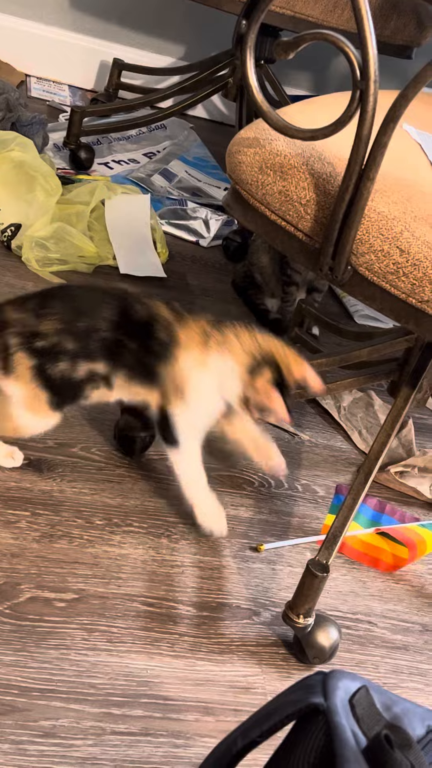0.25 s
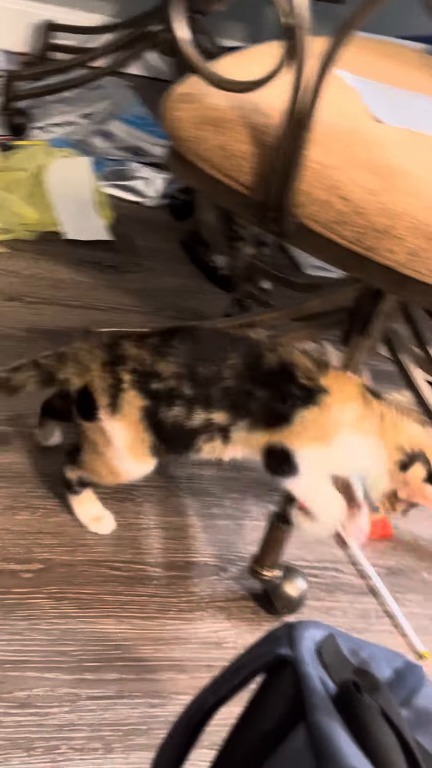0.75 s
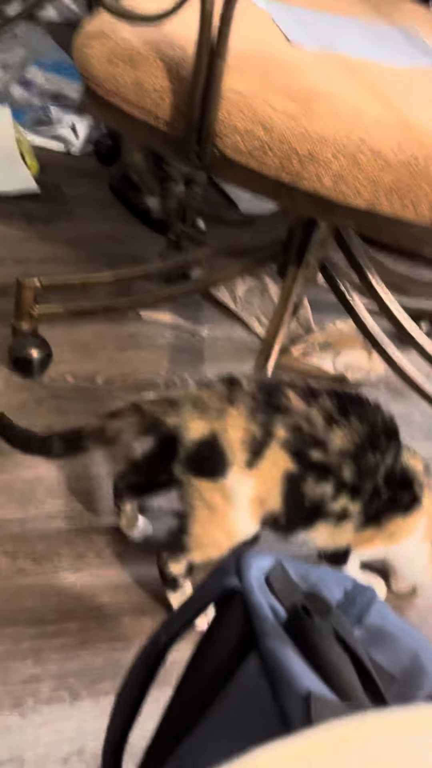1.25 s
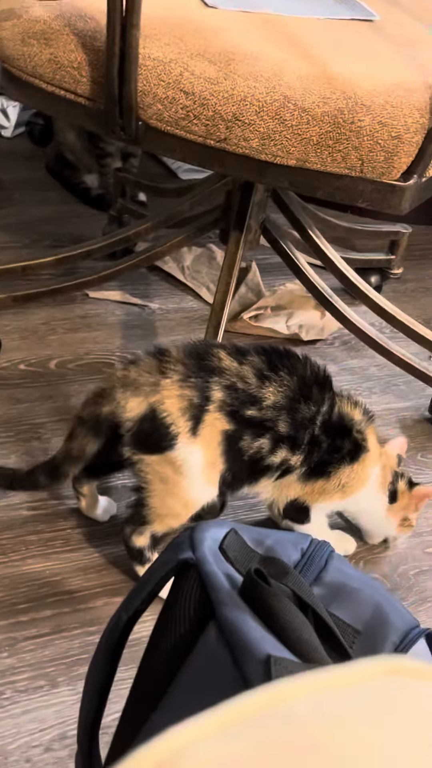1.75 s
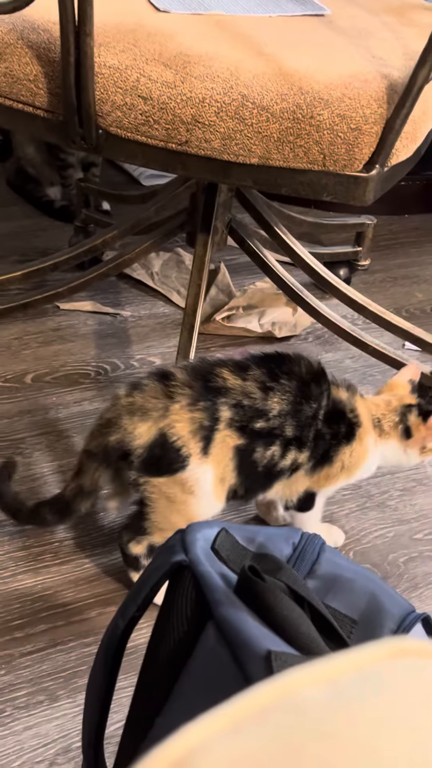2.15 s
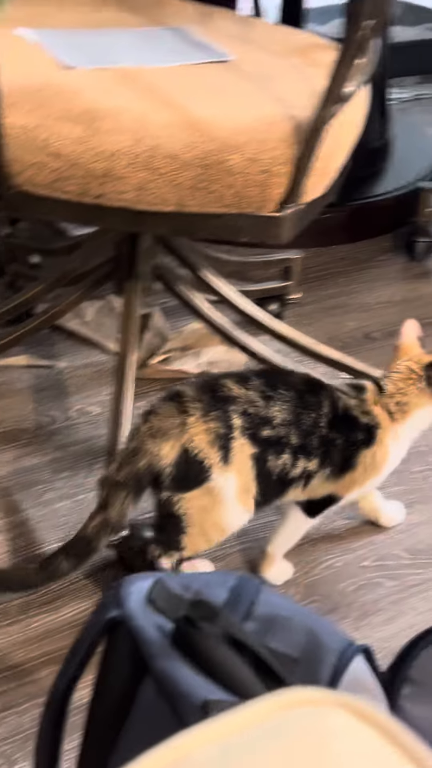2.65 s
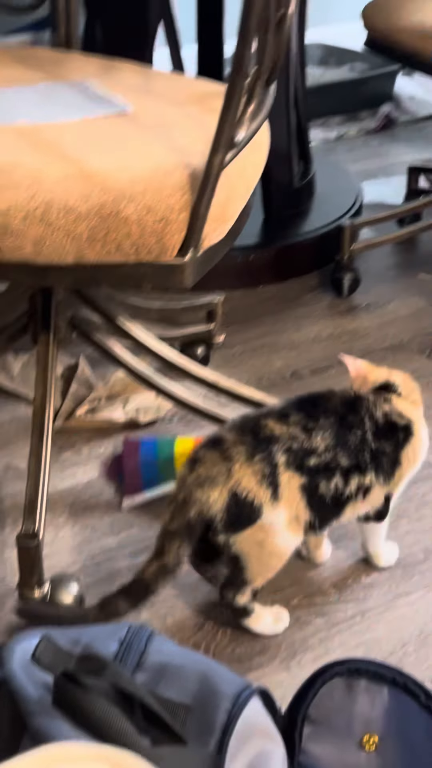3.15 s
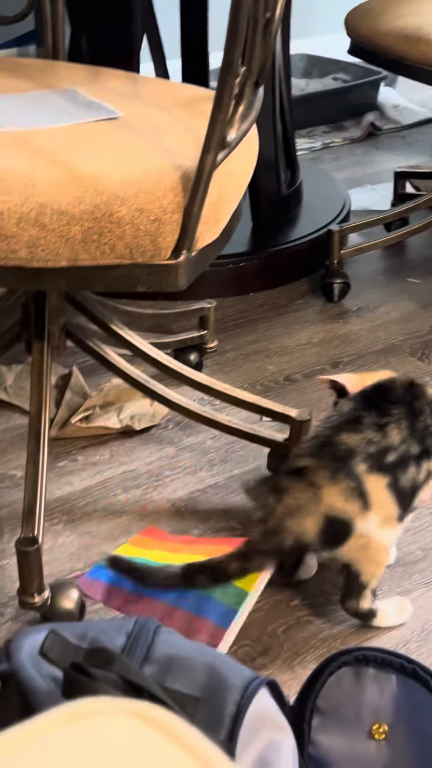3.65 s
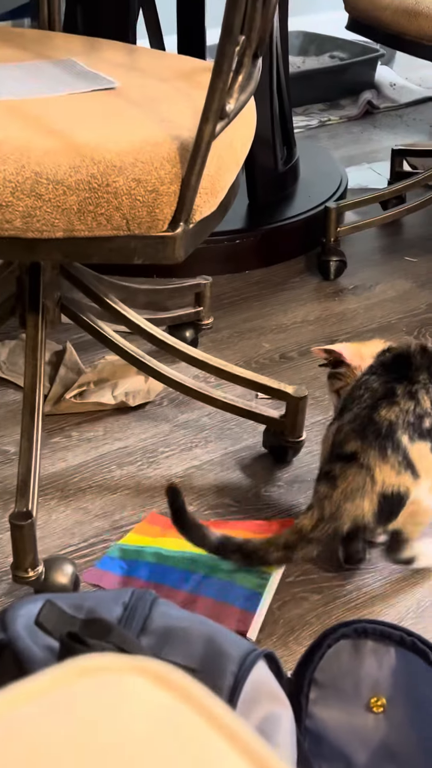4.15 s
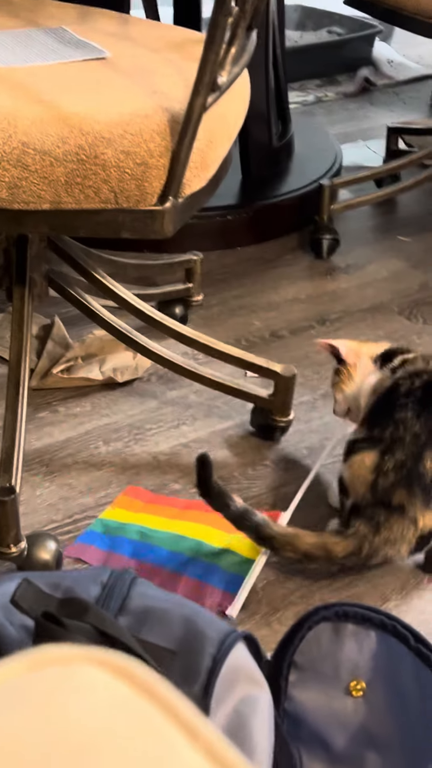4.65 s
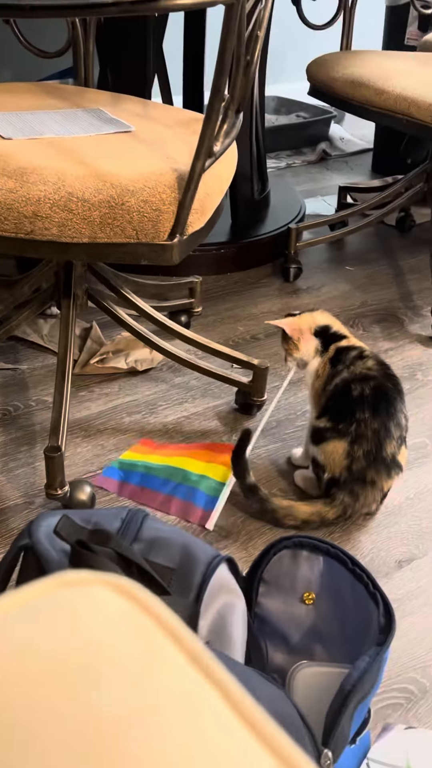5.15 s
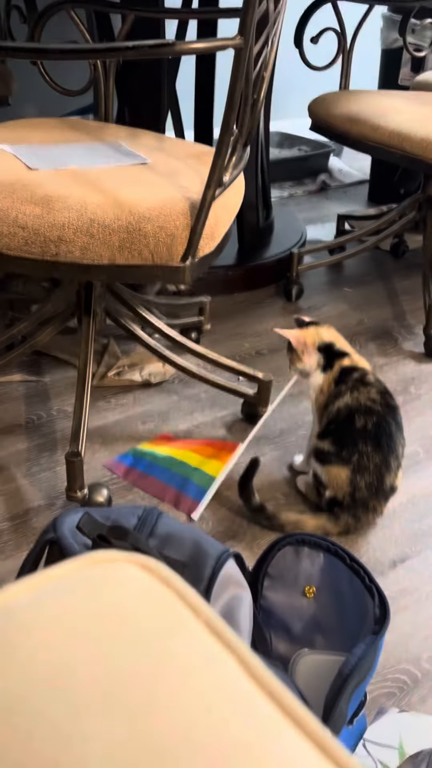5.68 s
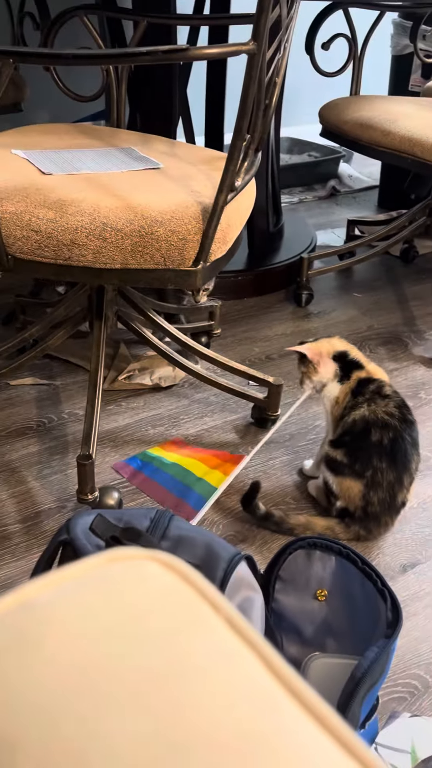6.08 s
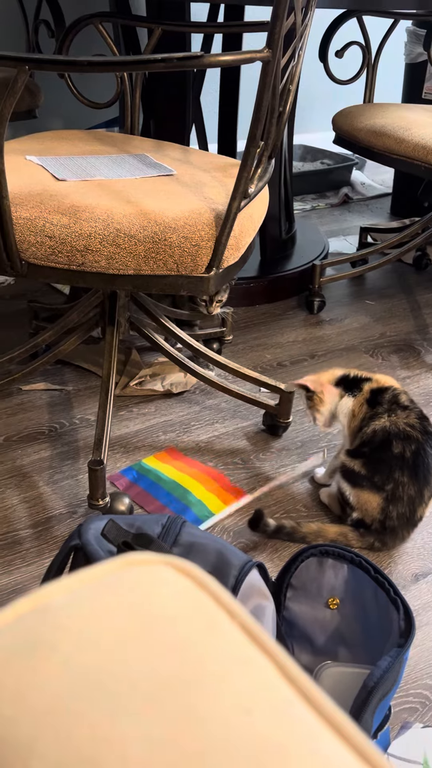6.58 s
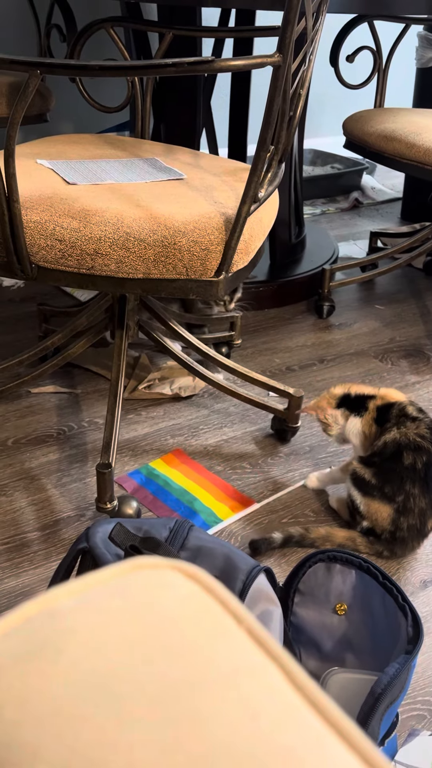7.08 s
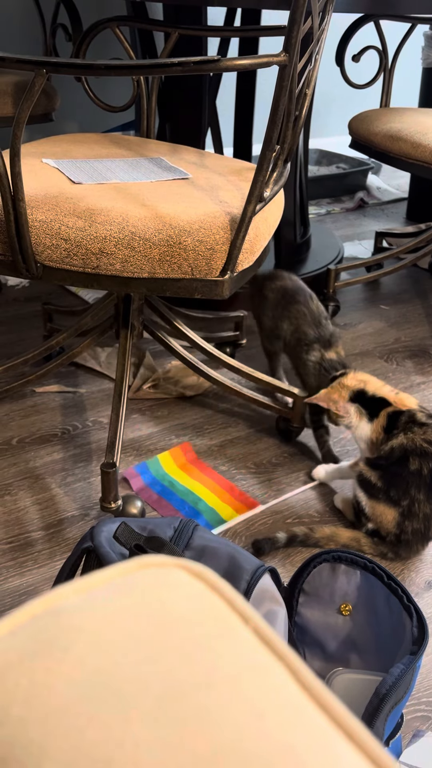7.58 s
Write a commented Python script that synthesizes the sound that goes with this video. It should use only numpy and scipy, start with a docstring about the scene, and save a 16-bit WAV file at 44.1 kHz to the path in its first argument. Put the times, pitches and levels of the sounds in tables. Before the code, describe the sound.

A quiet, hard-floored room heard through a handheld stereo microphone. Throughout, a low, slightly wavering fan and refrigerator hum sits in a soft wash of moving air; its deepest throb fades gradually after about 3.4 s. A soft paw push opens the scene. From 0.3 to 0.9 s a kitten's claws and a light plastic stick click and scrape on the floor, strongest near 0.4 s, with short bright echoes and another dull paw landing. A small step and tick come at 1.2 s. Between 2.5 and 3.7 s the dragged flag gives very faint, high, papery swishes. Around 5.2 s a tiny finger knock touches the microphone and the airy background shifts, becoming subtly wider. Faint swish, ticks and handling taps occur near 6.0-6.1 s. At 6.6 s the stick snaps crisply on the floor, the loudest click, with small trailing scrapes. Sparse faint ticks and a light knock follow from 7.1 to 7.7 s.

```python
"""A fan and a refrigerator hum over a wash of moving air in a quiet room: unsteady harmonics, shaped noise.
Soft paw landings are short low pushes. A kitten bats a small flag on a plastic stick across a hard floor:
stick and claws click (slips in narrow resonant bands, with echoes); cloth swishes (noise with tiny catches).
Fingers knock the hand-held microphone pair: damped notes without echo. The compressor's throb fades
as the pair leaves its standing wave; within 0.11 s after 5.17 s the stereo picture and balance change."""
import sys
import numpy as np
from scipy import signal
from scipy.fft import rfft, irfft
from scipy.io import wavfile
from scipy.ndimage import uniform_filter1d

SR = 44100
rng = np.random.default_rng(int(sys.argv[2]) if len(sys.argv) > 2 else 0)


def dump_mix(stems):
    """Bounce the given channels to the path in sys.argv[1] as a 16-bit WAV at rate SR."""
    frames = np.atleast_2d(stems).T  # one column per channel
    limited = np.clip(frames, -1, 1)  # hard clip at full scale
    pcm = np.round(limited * 32767).astype(np.int16)
    wavfile.write(sys.argv[1], SR, pcm)


N = 344862
T = np.arange(N) / SR
HZ = np.fft.rfftfreq(N, 1 / SR)

FAN_HZ, COMPRESSOR_HZ, MAINS_HZ = 27.95, 57.9, 60
# fan hum: multiple of the rotation rate, level/dB rms before the slow fade
FAN_ORDERS = [(1, -65.5), (3, -40.5), (6, -41), (9, -77), (12, -59.5), (15, -66), (18, -61.5)]
# compressor overtones: multiple of its rate, level/dB rms before BUZZ_DB
COMPRESSOR_ORDERS = [(7, -64), (9, -60.5), (10, -76.5), (14, -78), (30, -79), (31, -77.5), (32, -80.5),
                     (50, -87.5), (55, -83.5), (56, -87), (58, -91), (60, -81.5), (61, -80.5)]
# mains hum: multiple of the mains rate, level/dB rms
MAINS_ORDERS = [(2, -57)]
# weak tones: f/Hz, level/dB rms
TONES = [(74.8, -55.5), (148, -54.5), (376.5, -65), (550, -74)]
# gain of the compressor overtones: before/dB, after the glide/dB
BUZZ_DB = (-2, 1)
THROB_DB, THROB_FADE_FROM_S, THROB_FADE_DB_PER_S = -47, 3.4, 2.5  # compressor fundamental
FAN_START_DB, FAN_FADE_DB_PER_S = 0, 0.18
# moving air, before the band gains: f/Hz, density/dB per Hz
AIR_SPECTRUM = [(15, -81), (33, -80), (50, -67.5), (110, -71.5), (190, -75.5), (400, -76), (620, -83),
                (1000, -85.5), (1500, -91), (2400, -94), (4000, -102), (7000, -109.5), (10000, -117),
                (14800, -115), (16000, -138)]
# room resonances excited by the air, before the band gains: f/Hz, width/Hz, density/dB per Hz
ROOM_MODES = [(71.6, 31, -67.5), (170, 30, -64.5), (215.3, 15.1, -58.5), (237.6, 13.6, -66.5),
              (266.3, 17, -71), (331, 14, -76), (429.3, 22.7, -71.5), (512, 8.2, -76.5)]
# reverberation: f/Hz, t60/s
ROOM_T60 = [(200, 0.99), (2000, 0.36), (5000, 0.49), (9000, 0.37), (11500, 0.35), (15000, .1)]
# side-to-mid ratio by frequency: f/Hz, before/dB, after the glide/dB
STEREO_WIDTH = [(59, -55, -49), (140, -66, -30), (222, -27.5, -30), (328, -15, -11.5), (513, -5.5, -6),
                (737, 0.5, 0.5), (1180, 0, -3), (1900, -10, -2.5), (3000, -58, -3.5), (4000, -33, -11),
                (4720, -11, -15), (4990, 13, 3), (5480, -15, -12), (6650, -21, -18), (8100, -9.5, -20),
                (9530, 4, 9), (11740, -4.5, -5), (12700, 20, 24), (14000, 34, 32), (15600, 37, 26)]
# extra side-to-mid ratio for sources in front: f/Hz, offset/dB
FRONT_SIDE = [(1500, -18), (2800, -5), (4500, 0), (5000, 2), (5600, 0), (9500, -3), (12000, 11),
              (13000, -14), (14000, -12), (15600, -10)]
# glide of the stereo and balance settings: start/s, end/s
GLIDE_S = (5.17, 5.28)
EDGE_HZ = 17000  # upper band limit
# finger knocks: t/s, relative level/dB, f/Hz, decay time/s, right channel against left (-1 to 1)
KNOCKS = [ (5.145, -37, 520, 0.0032, -0.85), (5.187, -21, 2300, 0.00016, 1),
          (6.1262, -33.5, 1400, .0008, -1), (6.129, -35, 370, .0025, -1), (7.423, -36, 560, .0024, -1), ]
# paw landings: t/s, envelope peak/dB, f/Hz
PAW_LANDINGS = [(0.015, -33.5, 204.5), (0.413, -36.5, 159.5), (1.227, -35.5, 134)]
# flag pushes: fastest at t/s, speeding up/s, slowing down/s, relative level/dB, lower edge/Hz,
# resonance against swish/dB
STROKES = [ (2.69, .22, 0.11, -68, 3670, 1), (3.02, 0.076, .14, -67.5, 3670, -12),
           (3.26, 0.16, 0.15, -62.5, 3580, -9), (3.488, 0.053, 0.033, -63.5, 3630, 10),
           (3.585, 0.056, 0.1, -61, 3670, -5), (5.19, 0.13, 0.16, -68, 4200, -14),
           (6.0, 0.012, 0.14, -66, 5040, 7), ]
STROKE_DROP_DB, STROKE_ROUNDNESS = 12, 1.3  # drop over one rise or fall time; 1 = pointed, 2 = bell
# cloth swish: f/Hz, relative level/dB
CLOTH_SPECTRUM = [(2000, 5), (4300, 12), (6000, 7.5), (8000, 6.5), (10000, 1), (12000, 8), (12900, -16),
                  (15500, -32)]
# narrow resonant bands of the swish: f/Hz, mean lift above the swish/dB
RUB_BANDS = [(4200, 4.5), (4700, 8), (5320, 7), (5790, 9), (6880, 2), (7400, 3), (8300, 2), (9080, 3)]
RUB_WIDTH_HZ = 28
RING_OVER_EDGE = 1.15  # frequency ratio of a stroke's resonance to its lower edge
# clicks of stick and claws: t/s, relative strength/dB, brightness/dB per octave,
# scrape decay/s, most prominent f/Hz
CLICKS = [ (0.2997, -22.5, 4, .0004, 5300), (0.3026, -18, 3, .003, 5800), (0.31, -17, -4, .014, 3600),
          (0.4001, -12.5, 0.5, .0002, 2800), (0.4021, -12.5, 3, 0.00061, 3740),
          (0.4102, -18.5, 1, .0012, 3100), (0.427, -21, 6, .0016, 8700), (0.473, -21, 4, .014, 5800),
          (0.558, -27, 3, .006, 2200), (0.8306, -23, 1, .0003, 3500), (0.84, -17.5, -2.5, .016, 2700),
          (0.852, -22.5, -1, .0004, 3300), (0.859, -24, 2, .001, 2200), (0.908, -27.5, 6, .015, 7400),
          (1.235, -25, 3, .004, 8300), (6.045, -27, 5, .003, 5800), (6.127, -30, 3, .0005, 6900),
          (6.5973, -4.5, 3, 0.000075, 2280), (6.6006, -17, 4.5, .006, 5900), (6.6052, -22, -3, .0004, 1800),
          (6.6357, -24, 0, .007, 5900), (6.644, -21, -1, .0018, 5300), (6.654, -21, 1, .008, 5300),
          (7.075, -30, 1, .008, 5800), (7.372, -27.5, 5, .003, 5800), (7.478, -25, -3.5, .015, 2400),
          (7.512, -26, 0, .016, 3400), (7.638, -29, -3, .012, 2400), (7.696, -27, -3, .012, 2400), ]
# stick snap on the floor: f/Hz, relative level/dB
SNAP_SPECTRUM = [(200, -42), (1420, -7), (1800, 2), (2700, 2), (3700, 1), (4500, -2), (6000, -7.5),
                 (8000, -7.5), (9500, -10), (12000, -10.5), (16000, -7)]
# narrow resonant bands of the clicks: f/Hz, half-width/Hz, lift above the snap/dB
CLICK_BANDS = [(1850, 60, 6), (2176, 50, 6), (2620, 70, 5), (3060, 45, 1.5), (3320, 49, 6),
               (3900, 80, -1.5), (5260, 55, 6.5), (5850, 70, 6), (6430, 52, 5), (7400, 42, 2),
               (8360, 100, 1)]


def amp(db):
    """Decibels to gain."""
    return 10 ** (np.asarray(db) / 20)


def evened(x):
    """Scales to rms 1."""
    return x / np.sqrt(np.mean(x ** 2) + 1e-20)


def read(points, hz):
    """Interpolates a spectrum on a log-frequency axis."""
    f, value = np.transpose(points)
    return np.interp(np.log(hz + 1), np.log(f), value)


def add(mix, s, sound):
    """Adds a sound to the mix at time s."""
    part = mix[..., max(round(s * SR), 0):][..., :sound.shape[-1]]
    part += sound[..., :part.shape[-1]]


def noise(gain):
    """Two unrelated noises whose density per root Hz is gain."""
    return irfft(rfft(rng.standard_normal((2, N))) * gain, N) * np.sqrt(SR / 2)


def wander(rate_hz):
    """Two slow random curves of rms 1."""
    return evened(noise(np.exp(-(HZ / rate_hz) ** 2) * (HZ > 0)))


def glide(before, after):
    """A setting that moves linearly to a new value over GLIDE_S."""
    return before + np.interp(T, GLIDE_S, [0, 1]) * (after - before)


def causal(db, size=2048):
    """Minimum-phase pulse with this magnitude spectrum."""
    log_gain = np.log(amp(np.r_[db, db[-2:0:-1]]))
    spectrum = np.exp(np.conj(signal.hilbert(log_gain)))
    return irfft(spectrum[:len(db)], size)


def hum(rate_hz, orders, sway_hz, flutter):
    """Harmonics of a slightly unsteady rotation, each with its own phase in mid and side."""
    speed, load = wander(2.5)
    turns = np.cumsum(rate_hz + sway_hz * speed) / SR
    lines = 0
    for order, db in orders:
        phase = rng.random((2, 1))
        lines = lines + amp(db) * np.cos(2 * np.pi * (round(order) * turns + phase))
    return np.sqrt(2) * lines * (1 + flutter * load)


def machines():
    """A three-bladed fan, a refrigerator compressor, mains hum and a few weak tones."""
    fan = hum(FAN_HZ, FAN_ORDERS, sway_hz=0.037, flutter=0.073)
    fan = fan * amp(FAN_START_DB - FAN_FADE_DB_PER_S * T)
    # the fundamental holds, then fades as the microphones leave its standing wave
    fade_db = THROB_FADE_DB_PER_S * np.maximum(T - THROB_FADE_FROM_S, 0)
    throb = hum(COMPRESSOR_HZ, [(1, THROB_DB)], sway_hz=0.02, flutter=0.15) * amp(-fade_db)
    buzz = hum(COMPRESSOR_HZ, COMPRESSOR_ORDERS, sway_hz=0.028, flutter=0.075)
    buzz = buzz * amp(glide(*BUZZ_DB))
    mains = hum(MAINS_HZ, MAINS_ORDERS, sway_hz=0.005, flutter=0.058)
    tones = sum(hum(hz, [(1, db)], sway_hz=0.14, flutter=0.055) for hz, db in TONES)
    return fan + throb + buzz + mains + tones


def smoothed_twice(x, sizes, axes):
    """Two moving averages in turn."""
    for size, axis in zip(sizes, axes):
        x = uniform_filter1d(x, size=size, axis=axis)
    return x


def ripple(depth_db, size=120):
    """The fine peaks and dips that a room gives to a source that stands still."""
    curve = smoothed_twice(rng.standard_normal(len(HZ)), (size, size), (-1, -1))
    return amp(depth_db * evened(curve))


def air(rush_hz=480, hiss_hz=1500, ripple_db=2.0, rush_in_db=0.5, rush_out_db=2.0,
        hiss_in_db=-0.67, hiss_out_db=-1.4):
    """Broad air noise that excites room resonances; rush and hiss levels glide."""
    boom = 0
    for hz, width_hz, db in ROOM_MODES:
        boom = boom + amp(db) ** 2 / (1 + ((HZ - hz) / width_hz) ** 2 * 2) ** 3
    power = amp(read(AIR_SPECTRUM, HZ)) ** 2 + boom
    # power shares of the bands
    hiss = HZ ** 4 / (HZ ** 4 + hiss_hz ** 4)
    rush = (1 - hiss) * np.exp(-2 * np.log2((HZ + 1) / rush_hz) ** 2)
    rest = np.maximum(1 - hiss - rush, 0)
    out = noise(np.sqrt(power * rest))
    out += noise(np.sqrt(power * rush)) * amp(glide(rush_in_db, rush_out_db))
    hissing = noise(np.sqrt(power * hiss) * ripple(ripple_db))
    return out + hissing * amp(glide(hiss_in_db, hiss_out_db))


def stereo(sound, side_db=0):
    """Each frequency's power is shared between mid and side; the shares glide."""
    common, across = rfft(sound)
    before = [(hz, db) for hz, db, _ in STEREO_WIDTH]
    after = [(hz, db) for hz, _, db in STEREO_WIDTH]
    pictures = []
    for width in (before, after):
        ratio = amp(read(width, HZ) + side_db)
        shares = np.array([common, 1j * ratio * across]) / np.sqrt(1 + ratio ** 2)
        mid, side = irfft(shares, N)
        pictures.append(np.array([mid + side, mid - side]))
    return glide(*pictures)


def casing(crack_db=-4, crack_ratio=2.0, crack_share=0.25, rise_s=0.00028):
    """Finger knocks: a damped body note and a brief higher crack, too close for the room to answer."""
    t, out = np.arange(SR // 40) / SR, np.zeros((2, N))
    for s, db, hz, ring_s, right in KNOCKS:
        body = np.exp(-t / ring_s) * np.sin(2 * np.pi * hz * t)
        crack = np.exp(-t / (crack_share * ring_s)) * np.sin(2 * np.pi * crack_ratio * hz * t)
        onset = 1 - np.exp(-t / rise_s)
        knock = amp(db) * onset * (body + amp(crack_db) * crack)
        add(out, s, np.outer([1, right], knock))
    return out


def paws(rise_s=0.0165):
    """A padded paw gives the floor a short low push."""
    t, out = np.arange(SR // 4) / SR, np.zeros(N)
    for s, db, hz in PAW_LANDINGS:
        push = t / rise_s * np.exp(1 - t / rise_s)
        add(out, s, amp(db) * push * np.sin(2 * np.pi * hz * t))
    return out


def flag(level_db=2.0, crinkle=0.43, catches_per_s=260, patchy_db=2.0, width_hz=85,
         band_spread_db=1, size=65536):
    """Cloth and stick drag over the floor's grain: a swish with tiny catches and narrow resonant bands."""
    t, hz = (np.arange(size) - size / 2) / SR, np.fft.rfftfreq(size, 1 / SR)
    out = np.zeros((2, N))
    for s, rise_s, fall_s, db, edge_hz, ring_db in STROKES:
        away = np.maximum(-t / rise_s, t / fall_s)
        stroke = amp(level_db + db - STROKE_DROP_DB * away ** STROKE_ROUNDNESS)
        caught = rng.random(size) < catches_per_s / SR
        catches = evened((rng.random(size) - .5) * caught)
        friction = rng.standard_normal((2, size)) + crinkle * catches
        bands_db = 0
        for f, lift_db in RUB_BANDS:
            peak_db = lift_db + band_spread_db * rng.standard_normal()
            bands_db = bands_db + peak_db / (1 + ((hz - f) / RUB_WIDTH_HZ) ** 2)
        above_edge = hz ** 12 / (hz ** 12 + float(edge_hz) ** 12)
        colour = amp(read(CLOTH_SPECTRUM, hz) + bands_db) * above_edge
        off_ring = (hz - RING_OVER_EDGE * edge_hz) / width_hz
        colour *= 1 + amp(ring_db) / (1 + off_ring ** 2) ** 2
        add(out, s + t[0], stroke * evened(irfft(rfft(friction) * colour, size)))
    # patchy level over time and frequency
    z = signal.stft(out, SR, nperseg=512)[2]
    folds = evened(smoothed_twice(rng.standard_normal(z.shape[1:]), (3, 4), (0, 1)))
    return signal.istft(z * amp(patchy_db * folds), SR, nperseg=512)[1][:, :N]


def room(tail_db=-3, early_db=-6.0, early_t60_s=0.11, build_s=0.002, dull_hz=11300):
    """Scattered early echoes, then a tail; both low-passed at dull_hz."""
    t = np.arange(SR // 2) / SR
    taps = rng.standard_normal((2, len(t))) * (rng.random((2, len(t))) < .25)
    hz, at_s, z = signal.stft(taps, SR, nperseg=256)
    fade = amp(-60 * at_s / read(ROOM_T60, hz)[:, None])
    tail = signal.istft(z * fade, SR, nperseg=256)[1][:, :len(t)]
    tail = tail * (1 - np.exp(-t / build_s))
    early = rng.standard_normal((2, len(t))) * amp(-60 * t / early_t60_s) * (t > 1 / 1000)
    early *= rng.random(early.shape) < .05
    dull = signal.butter(12, min(dull_hz, SR / 2 - 100), fs=SR, output="sos")
    tail, early = signal.sosfilt(dull, [tail, early])
    return (amp(tail_db) * evened(tail) + amp(early_db) * evened(early)) / np.sqrt(len(t))


def clicks(level_db=-3, snap_s=0.001, scrape_direct_db=-6, snap_lift_db=8, peak_lift_db=3,
           peak_width_hz=130, slips_per_s=3000, delay_s=0.000284, size=2048):
    """Each contact, a snap and a short run of slips, sounds through narrow resonant bands, with echoes."""
    t, hz = np.arange(size) / SR, np.fft.rfftfreq(size, 1 / SR)
    octaves = np.log2(np.clip(hz, 700, 12000) / 4000)
    contact_db = read(SNAP_SPECTRUM, hz)
    for f, width_hz, lift_db in CLICK_BANDS:
        contact_db = contact_db + lift_db / (1 + ((hz - f) / width_hz) ** 2)
    # delay_s at 4 kHz; the treble arrives before the bass
    dispersion = np.exp(-4j * np.pi * delay_s * np.sqrt(4000 * hz))
    out = np.zeros((2, N))
    for s, db, bright_db, scrape_s, peak_hz in CLICKS:
        snap = np.exp(-scrape_s / snap_s)  # the briefer the contact, the more of it is snap
        slips = rng.standard_normal(size) * (rng.random(size) < slips_per_s / SR)
        force = np.sqrt(1 - snap) * evened(slips * np.exp(-t / scrape_s)) / np.sqrt(size)
        force[0] = np.sqrt(snap)
        # snaps stand out from their echoes, scrapes sink in
        direct_db = scrape_direct_db + snap_lift_db * np.sqrt(snap)
        paths = room()
        add(paths, 0, amp(direct_db) * force)
        peak_db = peak_lift_db / (1 + ((hz - peak_hz) / peak_width_hz) ** 2)
        pulse = causal(contact_db + bright_db * octaves + peak_db)
        pulse = irfft(rfft(pulse) * dispersion, size)
        add(out, s, amp(level_db + db) * signal.fftconvolve(paths, pulse[None], axes=1))
    return out


def scene():
    """Hum, air and paws all around, clicks and flag in front, knocks on the casing."""
    around = stereo(machines() + air() + paws())
    ahead = stereo(clicks() + flag(), side_db=read(FRONT_SIDE, HZ))
    return around + ahead + casing()


def record(dry):
    """The recorder's band limit: a linear-phase low-pass."""
    low_pass = signal.firwin(511, EDGE_HZ, window=("kaiser", 9), fs=SR)
    return signal.oaconvolve(dry, low_pass[None], "same")


dry = scene()
out = record(dry)
dump_mix(out)
```